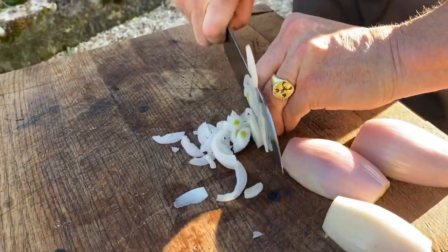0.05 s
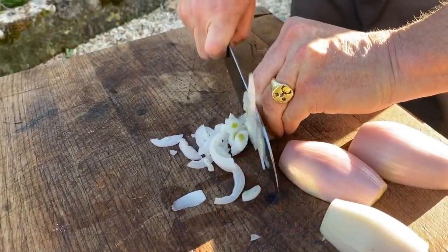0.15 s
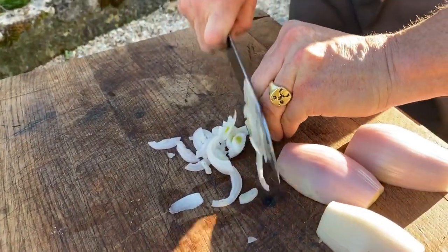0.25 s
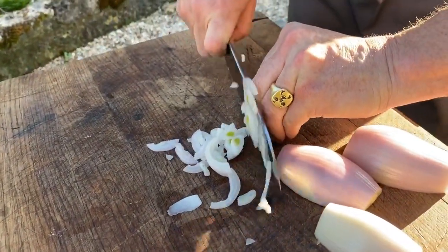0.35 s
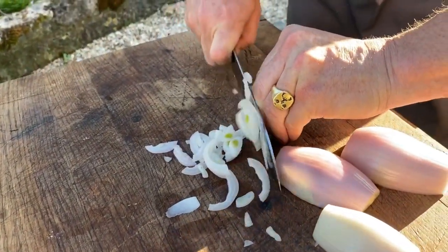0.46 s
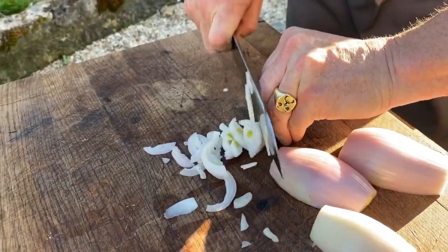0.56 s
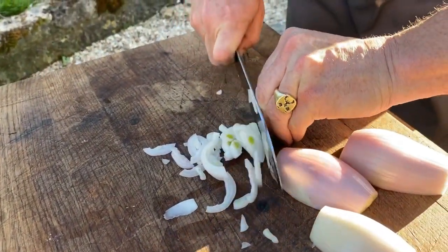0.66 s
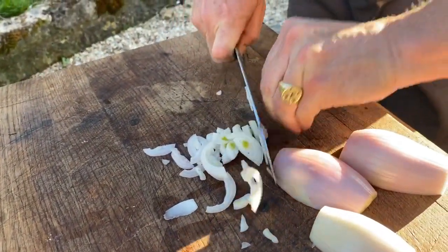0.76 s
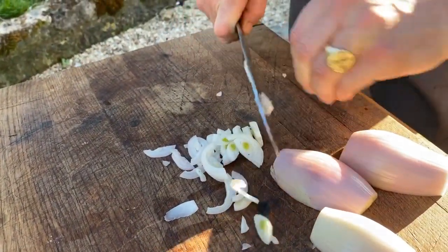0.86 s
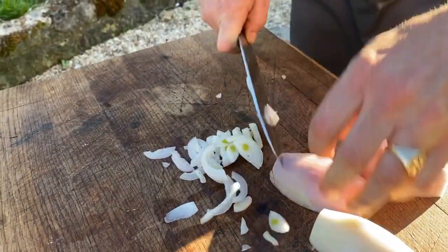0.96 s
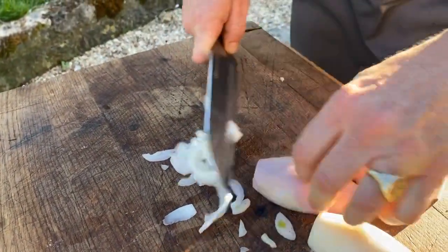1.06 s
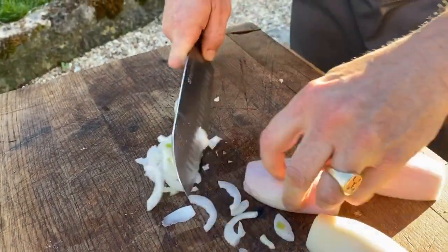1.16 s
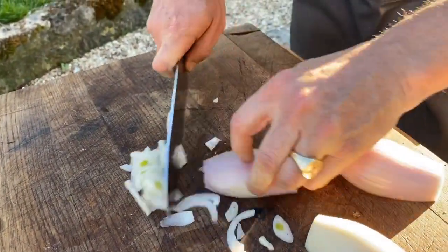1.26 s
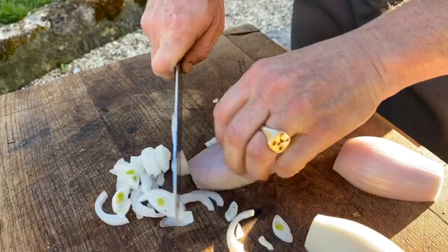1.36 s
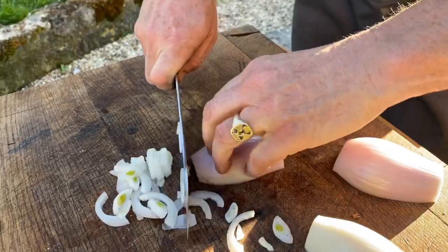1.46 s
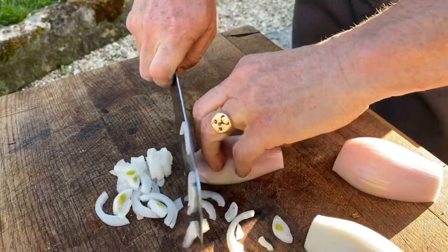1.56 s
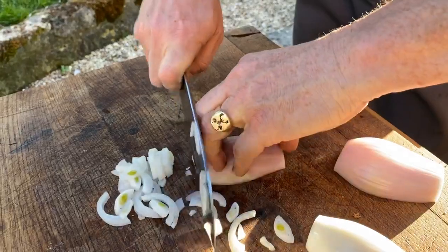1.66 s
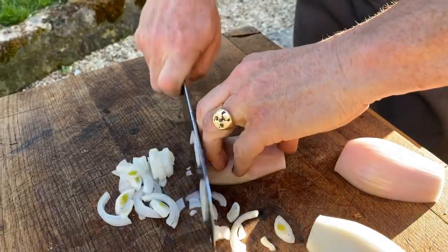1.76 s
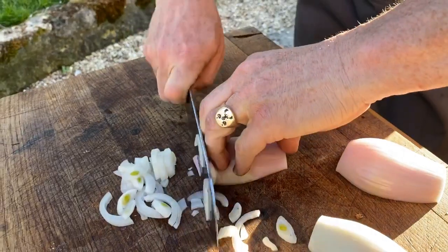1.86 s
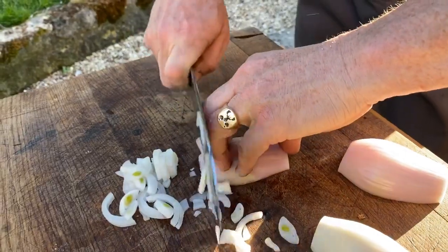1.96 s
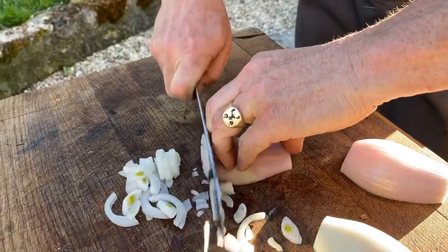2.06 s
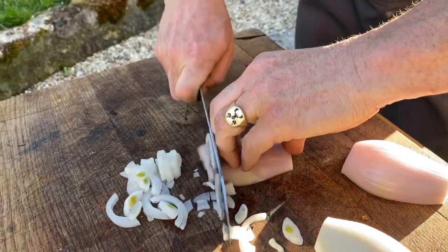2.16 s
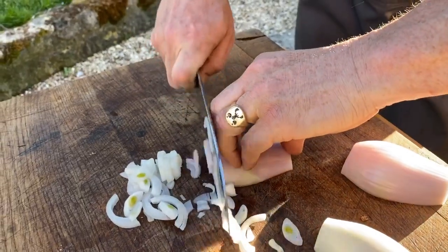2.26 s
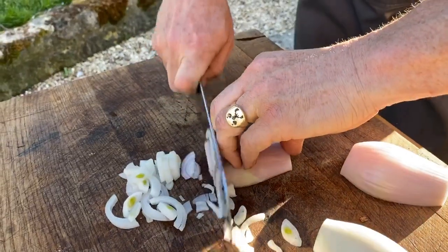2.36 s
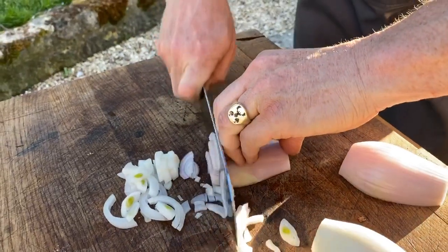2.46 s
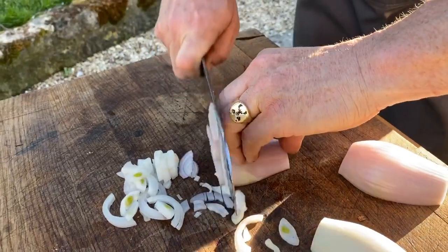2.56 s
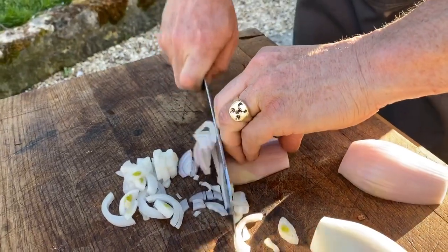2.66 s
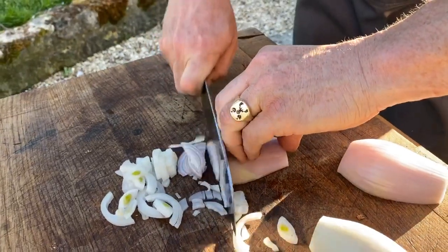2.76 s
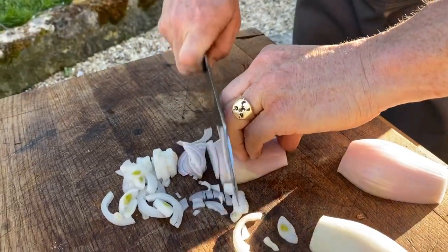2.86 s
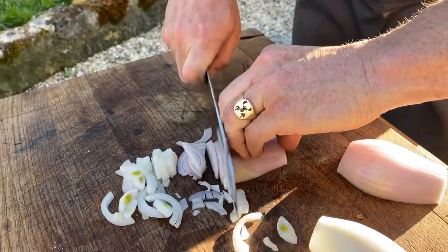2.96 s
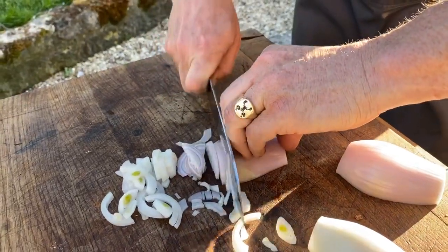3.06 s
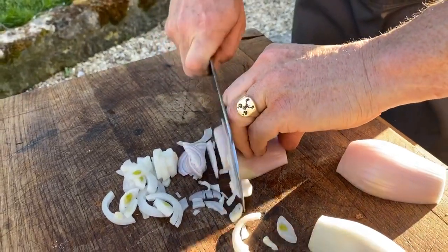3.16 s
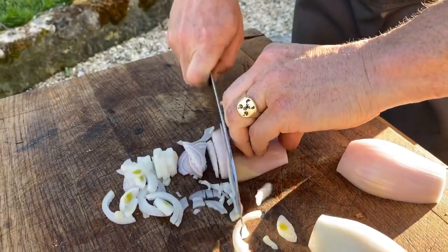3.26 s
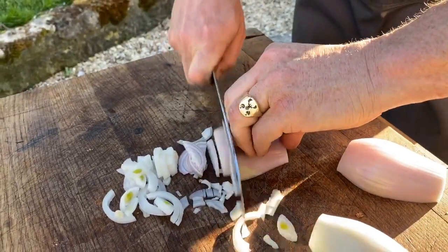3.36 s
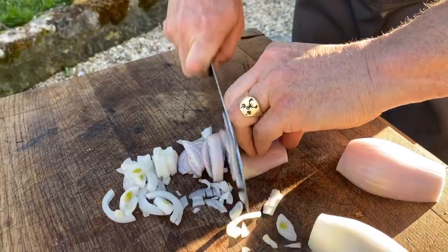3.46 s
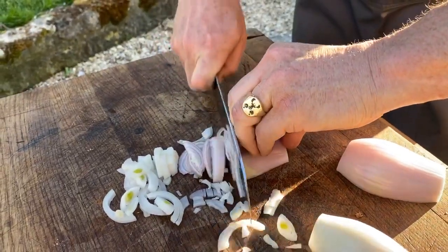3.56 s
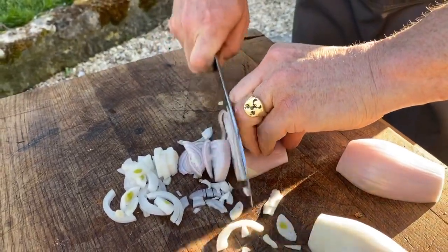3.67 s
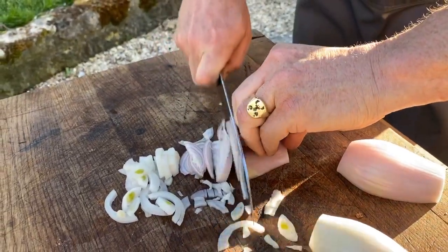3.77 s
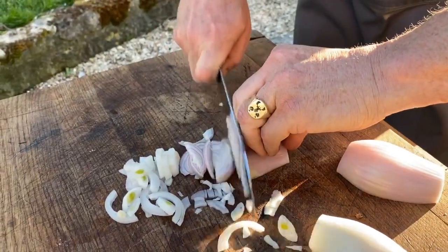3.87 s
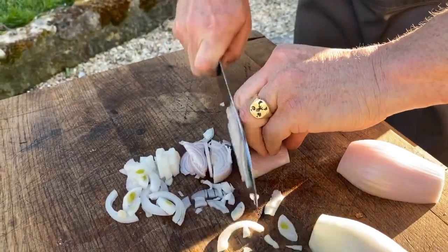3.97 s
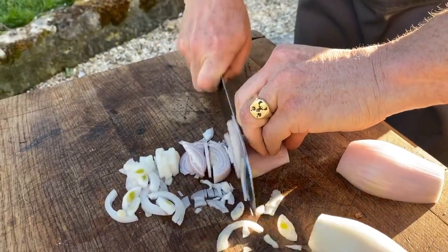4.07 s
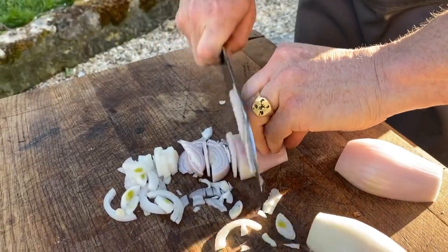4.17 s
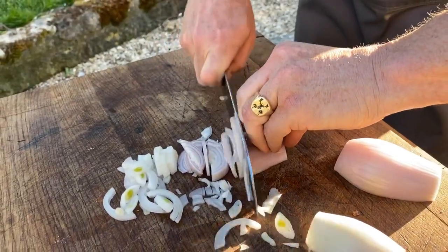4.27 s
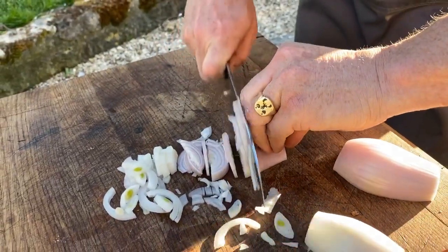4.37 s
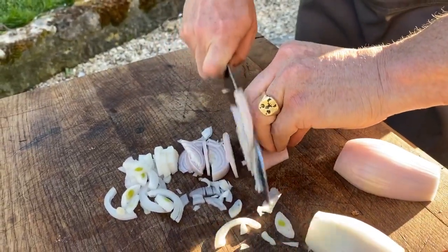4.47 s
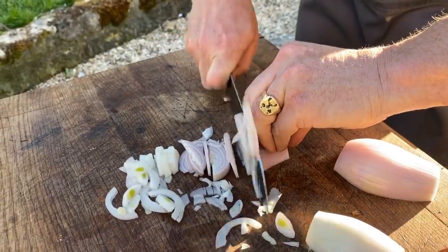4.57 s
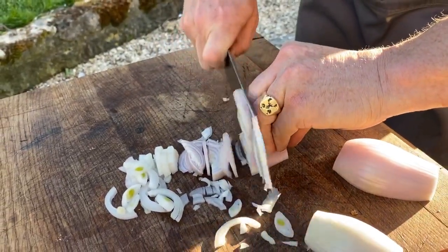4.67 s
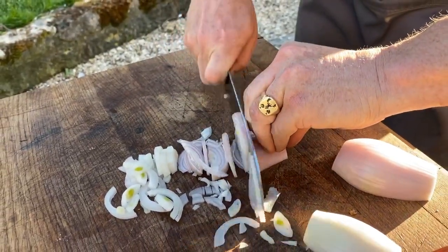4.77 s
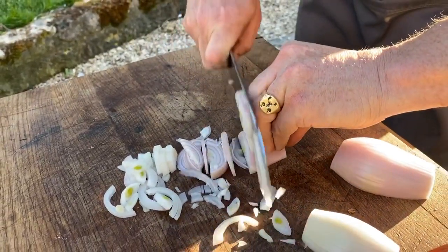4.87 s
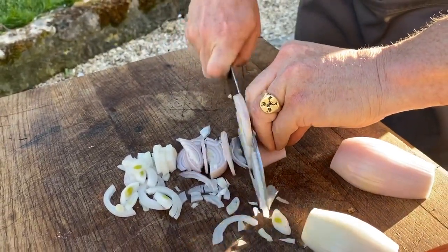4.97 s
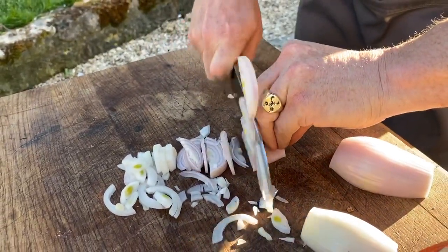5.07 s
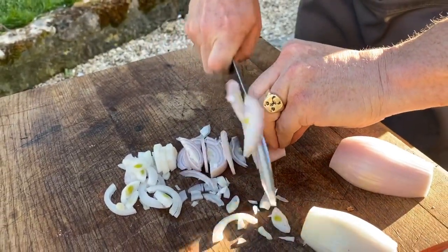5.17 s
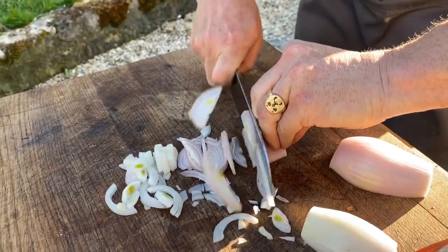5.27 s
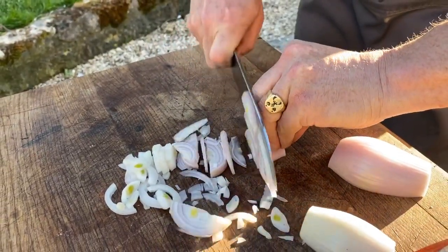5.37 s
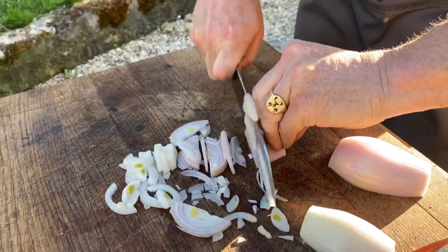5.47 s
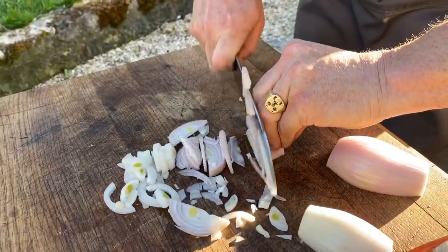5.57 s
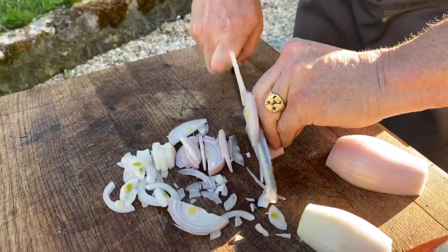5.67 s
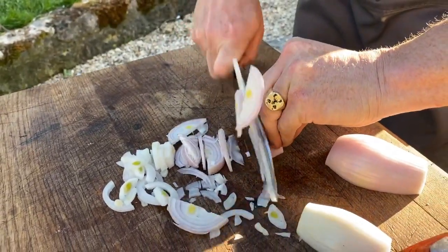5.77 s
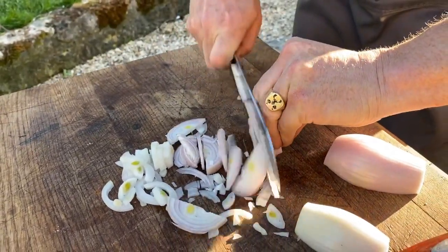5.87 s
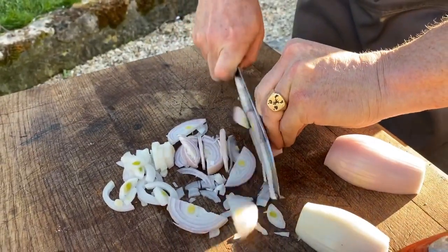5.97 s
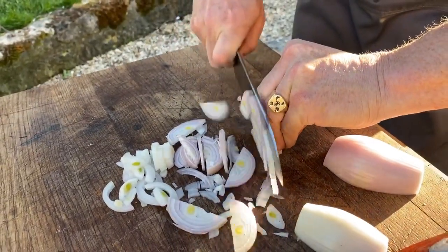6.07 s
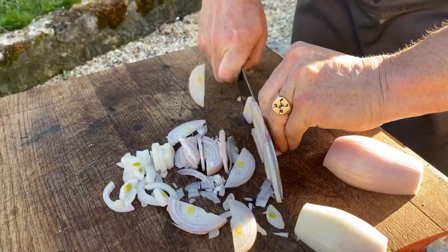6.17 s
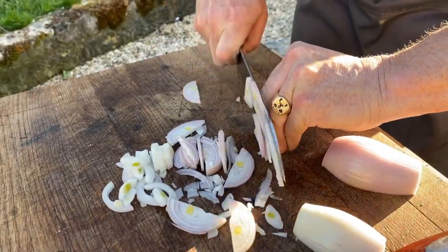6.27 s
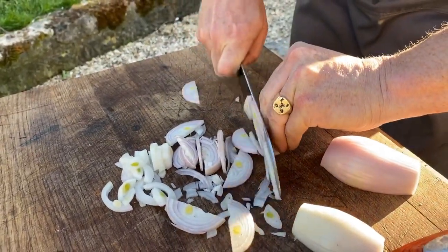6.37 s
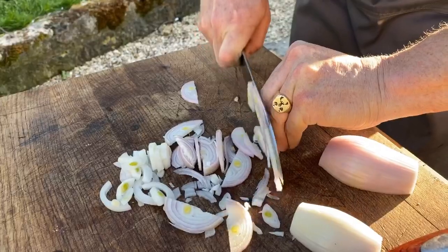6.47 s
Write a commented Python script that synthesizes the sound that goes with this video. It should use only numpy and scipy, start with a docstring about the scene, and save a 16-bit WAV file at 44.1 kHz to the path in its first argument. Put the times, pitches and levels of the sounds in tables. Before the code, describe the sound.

A knife slices shallots on a wooden board outdoors in quick, crisp knocks, pausing once briefly, with a light breeze.

```python
"""Slicing shallots outdoors

A chef's knife slices shallots on a thick wooden board, six strokes a second, pausing for the next bulb.
Each stroke crunches through the layers, knocks the board and scrapes on it so the blade rings thinly.
Near surfaces echo the knocks. A breeze buffets the close stereo microphone over a high hiss and faint
peeps. Fingers and bulb bump the board. The recorder's limiter ducks everything after the hardest knocks.
"""
import sys
import numpy as np
from scipy import signal
from scipy.fft import rfft, irfft, next_fast_len
from scipy.io import wavfile
from scipy.ndimage import uniform_filter1d, minimum_filter1d, map_coordinates

SR = 44100
rng = np.random.default_rng(int(sys.argv[2]) if len(sys.argv) > 2 else 0)


def digitize_waveform(pressure):
    """Quantize a signal to 16-bit integers and store it at the path in sys.argv[1].

    Rows of a 2-D input are taken as channels; values are limited to [-1, 1].
    """
    field = np.atleast_2d(pressure).T
    bounded = np.clip(field, -1, 1)
    quanta = np.round(bounded * 32767).astype(np.int16)
    wavfile.write(sys.argv[1], SR, quanta)


N = 287973

# Knife strokes. Each row: landing in seconds, blow in dB, ring in dB, clack in dB, bite in dB,
# scrape in dB, cutting time in seconds. Ring: how well the spot struck sounds the upper modes.
# Clack: how flat the edge lands. Bite: how sharply it catches the wood.
STROKES = [(-.042, -0.5, 7, -4, -5, -41.5, 0.027), (0.1265, 0.5, 4, -7.5, -1.5, -40, 0.032),
           (0.2943, 1, 11, -1.5, -9, -58, 0.023), (0.4612, -3.5, 0.5, 2, -16, -57, 0.027),
           (0.6315, -5.5, 4, -4.5, -14, -60, .028), (1.708, 1.5, 3.5, -3.5, 10, -31, .012),
           (1.8668, 3.5, 4.5, 0, 11.5, -35, 0.014), (2.0229, 5, -4.5, 3.5, 4.5, -28, 0.017),
           (2.1761, 0.5, 0, -4, 2.5, -52, .019), (2.3256, 2.5, 1.5, -3, 2, -44, 0.023),
           (2.478, 3.5, 3, 1, 13, -29, 0.019), (2.633, 4, 2, 1.5, 5, -33, 0.02),
           (2.7773, 7, 3.5, 11, 4, -24, 0.019), (3.0612, 3.5, 3, -4.5, -4, -33, 0.028),
           (3.2288, 4.5, 3, -2, 4, -27, 0.029), (3.393, 1, 2, -2.5, 3.5, -38, 0.032),
           (3.5755, -0.5, 2, -4.5, 0.5, -54, 0.036), (3.7472, 2, 0, -0.5, -8.5, -39, 0.042),
           (3.8935, 4.5, 6, -1.5, 7.5, -33, 0.019), (4.0655, 5, 5, 1, 4, -23, 0.02),
           (4.2509, -10.5, -2, -8, -2, -57, 0.033), (4.4088, 4.5, 5.5, -2, 3, -28, 0.036),
           (4.5679, 7, 8, 6, 5, -24, 0.022), (4.738, 5.5, 6, 13.5, 2, -24, .022),
           (4.9265, -2, 7.5, -9, -7, -40, 0.032), (5.1034, 5, 6, -4.5, 2.5, -31, 0.034),
           (5.2598, 4, 9.5, 9, 5, -28, 0.02), (5.4543, -9.5, 0, 1, 4, -44, 0.048),
           (5.6168, -1, 4.5, 0.5, 3, -37, .034), (5.791, 0, 8, -3, 3, -39, 0.035),
           (5.9845, 0.5, 13, -3.5, -1, -38, 0.041), (6.161, 1.5, 11.5, -1.5, 1, -37, 0.035),
           (6.3316, 1, 11, 1, 2, -39, 0.021), (6.5208, -4, 12.5, -3, 8, -37, 0.028)]
# Board modes. Each row: frequency in Hz, t60 in seconds, level in dB, left minus right in dB,
# left phase lead in radians.
BOARD_MODES = [(214, 0.068, -45.5, -15, -5), (278, 0.038, -26.5, 3.5, -0.1), (391.4, 0.16, -15, -7.7, -6.5),
               (403.8, 0.061, -15, -2, 0.37), (532, 0.013, -9.5, 6, -0.2), (671.3, 0.043, -10.5, 0.3, 4),
               (698, 0.037, -9.5, -8, -0.32), (703.4, 0.34, -35.5, -13, 2), (851.2, 0.11, -12.5, 2.5, -0.1),
               (899, 0.31, -38, 0.5, 2), (1015, 0.086, -14.5, -5.5, 1.92), (1104, 0.03, -8, -7.5, -1.5),
               (1138, 0.33, -32.5, -4.5, -0.5), (1243.7, 0.05, -15.5, -14.5, -3),
               (1306, 0.045, -0.5, 8, -3), (1312.7, 0.031, -2.5, 15.5, 2.5), (1484.4, 0.038, -9, -5, 0.1),
               (1756, 0.027, -6, -6.5, 3.5), (1772.6, 0.035, -8.5, -4.5, -1.36),
               (1853, 0.021, -25, -16, -2.9), (2160, 0.016, -25.5, -19.5, -0.5),
               (2310, 0.31, -50.5, -1.5, 2), (2480, 0.019, -22.5, 11, -0.2), (2944, 0.0089, -11.5, 5, 1.8),
               (2894, 0.031, -31.5, -2.9, 1.5), (3500, 0.023, -30, 10, 0.45), (3590, 0.22, -50.5, 5.5, 1.5),
               (4130, 0.031, -37, 17, -1.2)]
# Blade modes. Each row: frequency in Hz, t60 in seconds, level in dB.
BLADE_MODES = [(4380, .008, 2), (8440, 0.0047, -12), (10140, 0.03, -6), (11120, .035, -5), (11820, .02, -7),
               (12770, .012, -13.5), (13350, .012, -28.5), (15100, .01, -13)]
# Echoes off ground and body. Each row: lag in seconds, gain.
ECHOES = [(0.00418, 0.32), (0.00643, 0.48)]
# Breeze, light and then gusty. Each row: time in seconds, buffeting in dB, flutter in dB.
WIND_LEVELS = [(0, -41, -47), (.13, -46, -48), (.24, -43, -40.5), (.45, -39, -60), (.63, -53.5, -51),
               (.9, -42.5, -55.5), (1.25, -52, -60.5), (1.5, -45, -61), (1.95, -52.5, -63),
               (2.52, -51, -62), (2.62, -43, -43), (2.87, -48, -51), (3.05, -47.5, -56), (3.6, -51, -58),
               (3.9, -39.5, -55), (4, -30.5, -42), (4.3, -36, -43.5), (4.38, -44.5, -76), (4.6, -37.5, -47),
               (4.77, -37, -53), (4.86, -54, -60), (4.95, -36.5, -50), (5.08, -33, -47.5),
               (5.22, -33, -39.5), (5.36, -41.5, -52), (5.52, -52, -69), (5.56, -30, -49), (5.63, -52, -67),
               (6, -39.5, -58), (6.09, -56, -69), (6.33, -33, -46.5), (6.53, -59, -68)]
# Outdoor hiss. Each row: time in seconds, level in dB.
HISS_LEVELS = [(0, -52.5), (.8, -52), (1.3, -49), (3.6, -51.5), (4.8, -53), (5.8, -49.5), (6.53, -50.5)]
# Distant peeps. Each row: start in seconds, level in dB.
DISTANT_PEEPS = [(.055, -42.5), (.22, -45.5), (0.381, -46), (2.11, -49)]
# Fingers and bulb on the board. Each row: start in seconds, level in dB.
BOARD_BUMPS = [(0.383, -39), (1.105, -32.5), (1.122, -33.5), (1.422, -38.5), (1.488, -38.5), (1.529, -36.5),
               (1.593, -40.5)]
# Blade and skins over the wood. Each row: start in seconds, length in seconds, level in dB.
WOOD_BRUSHES = [(0.914, 0.029, -47.5), (1.005, 0.06, -49), (1.059, 0.011, -44.5), (1.078, 0.1, -57.5),
                (1.187, 0.075, -45), (1.38, 0.039, -49), (1.44, 0.12, -58), (2.893, 0.041, -35)]
# Noise spectra by source. Each row: frequency in Hz, relative density in dB.
CRUNCH_SPECTRUM = [(300, 1.5), (1200, 3.5), (2100, 0.5), (3700, -0.5), (5600, -7.5), (7500, -9), (9000, -9),
                   (11500, -4.5), (13500, -23.5), (16000, -16)]
SCATTER_SPECTRUM = [(100, -11.5), (330, -1), (460, 3.5), (560, 3.5), (680, 3), (820, -2), (950, -7.5),
                    (1250, 4.5), (1550, -2), (1900, -7.5), (2300, -17.5), (3100, -21.5), (4500, -30.5),
                    (9000, -44.5)]
BUFFET_SPECTRUM = [(15, -17), (35, -8.5), (65, -1.5), (100, -3), (170, -15), (300, -29.5), (800, -59.5)]
FLUTTER_SPECTRUM = [(50, -20), (120, -2.5), (200, -1.5), (330, -5), (520, -13.5), (900, -22), (3000, -42.5)]
HISS_SPECTRUM = [(100, 5.5), (500, -15.5), (1500, -17.5), (2800, -9), (3500, -5), (4400, -7), (5700, 1),
                 (7300, 0.5), (8700, -2), (10500, -7), (12400, -14.5), (13500, -36), (16000, -37.5)]
BUMP_SPECTRUM = [(40, -15), (130, 7), (300, 1), (520, -6), (900, -56), (3000, -46.5)]
BRUSH_SPECTRUM = [(150, 6.5), (500, 4.5), (1800, -1.5), (4000, -8), (11000, -7.5), (15000, -20)]

SIDES = np.array([[1], [-1]])  # left, right
TIME_S = np.arange(N) / SR


def undb(db):
    """Decibels to gain."""
    return 10 ** (np.asarray(db) / 20)


def unit_rms(x):
    """Scale to rms 1."""
    return x / np.sqrt(np.mean(x ** 2))


def seconds(length_s):
    """Time axis of a short sound."""
    return np.arange(int(length_s * SR)) / SR


def add(out, start_s, x):
    """Mix x into out from start_s, dropping what falls outside."""
    start = int(start_s * SR)
    x = x[..., max(-start, 0):]
    start = max(start, 0)
    out[:, start:start + x.shape[-1]] += x[..., :N - start]


def tint(x, spectrum):
    """Minimum-phase filter through (Hz, dB) points."""
    size = 2 * next_fast_len(x.shape[-1])
    hz, db = np.transpose(spectrum)
    log_hz = np.log(np.arange(size // 2 + 1) * SR / size + 1)
    gain = undb(np.interp(log_hz, np.log(hz), db))
    cepstrum = irfft(np.log(gain))
    cepstrum[1:size // 2] *= 2
    cepstrum[size // 2 + 1:] = 0
    return irfft(rfft(x, size) * np.exp(rfft(cepstrum)))[..., :x.shape[-1]]


def noise(size, side_db):
    """Stereo noise; long waves reach both microphone ports nearly alike."""
    mid, side = rng.standard_normal((2, size))
    side = tint(side, [(40, -4.5), (200, -9), (500, 1), (1300, -1)])
    return unit_rms(mid + undb(side_db) * SIDES * side)


def shaped_noise(size, spectrum, side_db):
    """Filtered stereo noise, rms 1."""
    return unit_rms(tint(noise(size, side_db), spectrum))


def wander(rate_hz):
    """Smooth random curve, rms 1."""
    knots = rng.standard_normal(int(N / SR * rate_hz) + 2)
    return unit_rms(map_coordinates(knots, [TIME_S * rate_hz], order=2, mode="nearest"))


def crackle(size, spread_db):
    """Dense clicks of very unequal size, as from bursting cells."""
    return unit_rms(noise(size, side_db=-0.49) * undb(spread_db * rng.exponential(size=size)))


def crunch(gain_db, usual_cut_s, release_s, pop_db):
    """Layers burst until just after the blade meets wood; quicker, harder cuts are louder."""
    out = np.zeros((2, N))
    for land_s, blow_db, *_, cut_s in STROKES:
        level_db = gain_db + 4.5 * np.log2(usual_cut_s / cut_s) + 0.25 * blow_db
        t = seconds(cut_s + 0.05)
        push = np.minimum(t / 0.01, 1) * np.exp(-np.maximum(t - cut_s, 0) / release_s)
        # skins give way in pops of about 1 ms
        pop_sizes = np.interp(t, np.linspace(0, t[-1], 70), rng.exponential(size=70))
        pops = unit_rms(undb(pop_db * pop_sizes))
        cells = unit_rms(tint(crackle(len(t), spread_db=1.5), CRUNCH_SPECTRUM))
        add(out, land_s - cut_s, undb(level_db) * push * pops * cells)
    return out


def board_ring(contact_s, detune_spread, spot_spread_db, damping_spread):
    """One blow on the board; hand weight and the spot struck vary each mode a little."""
    t = seconds(0.3)
    ring = np.zeros((2, len(t)))
    for hz, t60_s, db, pan_db, lead_rad in BOARD_MODES:
        detune, spot, grip = rng.standard_normal(3)
        mode_hz = hz * (1 + detune_spread * detune)
        decay_per_s = np.log(1000) / t60_s * np.exp(damping_spread * grip)
        swing = np.exp((2j * np.pi * mode_hz - decay_per_s) * t[t < t60_s])
        port_gain = undb(db + spot_spread_db * spot + SIDES * pan_db / 2)
        port_phase = np.exp(1j * SIDES * lead_rad / 2)
        add(ring, 0, (port_gain * port_phase * swing).imag)
    return ring * (1 - np.exp(-t / contact_s))


def knock_spectrum(blow_db, ring_db, clack_db, bite_db):
    """(Hz, dB) colour of one landing; almost no deep bass comes through."""
    soft_db, hard_db = max(-blow_db, 0), max(blow_db, 0)
    thud_db = 0.5 + 0.37 * soft_db - 0.2 * ring_db - 0.15 * hard_db  # cushioned blows are mostly thud
    deep_db = thud_db + 0.89 * hard_db  # hard blows shove the whole board
    mid_db = -0.5 + 0.25 * clack_db  # flat landings lift the middle
    return [(20, -24), (110, deep_db), (250, deep_db), (380, thud_db), (900, thud_db),
            (1200, 0), (1380, 0), (1520, mid_db), (1700, mid_db), (1820, ring_db), (2080, ring_db),
            (2400, clack_db / 2), (2800, clack_db), (3250, clack_db),
            (3600, bite_db / 2 - 2), (4100, bite_db), (4450, bite_db), (5000, 0)]


def scatter(gain_db, t60_s, late_db, late_t60_s, build_s):
    """Stones and walls scatter a knock: a short diffuse tail and a faint longer one."""
    t = seconds(0.3)
    fade = undb(-60 * t / t60_s) + undb(late_db - 60 * t / late_t60_s)
    build = np.minimum(t / build_s, 1)
    return undb(gain_db) * shaped_noise(len(t), SCATTER_SPECTRUM, side_db=-0.73) * fade * build


def knocks(gain_db, tail_contrast):
    """The edge lands on the board. Returns direct and scattered sound."""
    direct, scattered = np.zeros((2, 2, N))
    for land_s, blow_db, ring_db, clack_db, bite_db, *_ in STROKES:
        spectrum = knock_spectrum(blow_db, ring_db, clack_db, bite_db)
        # scatter gathers sound from all sides of the board, so it varies less
        tail_spectrum = [(hz, tail_contrast * db) for hz, db in spectrum]
        ring = board_ring(contact_s=0.00038, detune_spread=0.0074, spot_spread_db=1.4,
                          damping_spread=0.037)
        tail = scatter(gain_db=-21.5, t60_s=0.14, late_db=-17.5, late_t60_s=0.5, build_s=0.0086)
        gain = undb(gain_db + blow_db)
        add(direct, land_s, gain * tint(ring, spectrum))
        add(scattered, land_s, gain * tint(tail, tail_spectrum))
    return direct, scattered


def near_echoes(x, lowpass_hz):
    """Ground and body throw back dull copies within a few milliseconds."""
    lowpass = signal.butter(2, lowpass_hz, fs=SR, output="sos")
    dull = signal.sosfiltfilt(lowpass, x, padtype="constant")
    out = np.zeros((2, N))
    for lag_s, gain in ECHOES:
        add(out, lag_s, gain * dull)
    return out


def blade_scrape(gain_db, skid_s):
    """The edge skids briefly in the wood and the steel rings."""
    out, t = np.zeros((2, N)), seconds(0.05)
    steel = sum(undb(db - 60 * t / t60_s) * np.sin(2 * np.pi * hz * t) for hz, t60_s, db in BLADE_MODES)
    steel /= np.linalg.norm(steel)
    for land_s, *_, scrape_db, _ in STROKES:
        skid = crackle(len(t), spread_db=3) / (1 + (t / skid_s) ** 6)
        add(out, land_s, undb(gain_db + scrape_db) * signal.fftconvolve(skid, steel[None], axes=1))
    return out


def breeze(buffet_gain_db, flutter_gain_db, puff_db, eddy_db):
    """Slow buffets and quicker eddies at the microphone ports; both come in puffs."""
    times_s, buffet_db, flutter_db = np.transpose(WIND_LEVELS)
    swell_db = puff_db * wander(rate_hz=12)
    low_db = buffet_gain_db + np.interp(TIME_S, times_s, buffet_db) + swell_db
    low_db = low_db + 3.7 * SIDES  # stronger on the left
    buffets = undb(low_db) * shaped_noise(N, BUFFET_SPECTRUM, side_db=-1.7)
    high_db = flutter_gain_db + np.interp(TIME_S, times_s, flutter_db) + swell_db
    high_db += eddy_db * wander(rate_hz=35)
    eddies = undb(high_db) * shaped_noise(N, FLUTTER_SPECTRUM, side_db=-0.64)
    return buffets + eddies


def outdoor_hiss(gain_db, flicker_db):
    """A high hiss that swells and sinks."""
    level_db = np.interp(TIME_S, *np.transpose(HISS_LEVELS)) + flicker_db * wander(rate_hz=25)
    return undb(gain_db + level_db) * shaped_noise(N, HISS_SPECTRUM, side_db=1.9)


def peeps(gain_db, pitch_hz, length_s):
    """Faint, thin peeps far off, blurred by an unsteady pitch."""
    out, t = np.zeros((2, N)), seconds(length_s)
    envelope = np.sin(np.pi * t / length_s) * np.exp(-t / length_s)
    for start_s, db in DISTANT_PEEPS:
        drift_rad = np.cumsum(0.09 * rng.standard_normal(len(t)))
        add(out, start_s, undb(gain_db + db) * envelope * np.sin(2 * np.pi * pitch_hz * t + drift_rad))
    return out


def bumps(rise_s):
    """Fingers and bulb thump softly on the board."""
    out, t = np.zeros((2, N)), seconds(0.12)
    envelope = t / rise_s * np.exp(1 - t / rise_s)
    for start_s, db in BOARD_BUMPS:
        add(out, start_s, undb(db) * envelope * shaped_noise(len(t), BUMP_SPECTRUM, side_db=0))
    return out


def brushes():
    """Blade and skins rub over the wood as slices are pushed aside."""
    out, t = np.zeros((2, N)), seconds(0.12)
    for start_s, length_s, db in WOOD_BRUSHES:
        rub = unit_rms(tint(crackle(len(t), spread_db=3.2), BRUSH_SPECTRUM))
        envelope = np.sin(np.pi * np.minimum(t / length_s, 1))
        add(out, start_s, undb(db) * envelope * rub)
    return out


def limiter(x, threshold_db, sense_s, hold_s, release_s):
    """A hard knock turns everything down at once; the gain holds, then recovers."""
    sense, hold = int(sense_s * SR) + 1, int(hold_s * SR) + 1
    power = uniform_filter1d(np.mean(x ** 2, axis=0), sense)
    wanted_db = -10 * np.log10(np.maximum(power / undb(threshold_db) ** 2, 1))
    held_db = minimum_filter1d(wanted_db, hold, origin=(hold - 1) // 2, mode="nearest")
    pole = np.exp(-1 / (release_s * SR))
    gain_db = np.minimum(held_db, signal.lfilter([1 - pole], [1, -pole], held_db))
    return x * undb(uniform_filter1d(gain_db, sense, origin=-(sense // 2) + 1))


def scene():
    """Knife and board with their echoes, in the open air."""
    direct, scattered = knocks(gain_db=-0.5, tail_contrast=0.67)
    board = direct + near_echoes(direct, lowpass_hz=2180) + scattered
    knife = crunch(gain_db=-34, usual_cut_s=0.023, release_s=0.015, pop_db=2.5)
    knife += blade_scrape(gain_db=-4.5, skid_s=0.016)
    air = breeze(buffet_gain_db=1, flutter_gain_db=1.5, puff_db=2, eddy_db=3.5)
    air += outdoor_hiss(gain_db=4.5, flicker_db=1)
    air += peeps(gain_db=2, pitch_hz=3680, length_s=0.053)
    return board + knife + air + bumps(rise_s=0.0073) + brushes()


def record(dry):
    """The recorder drops deep bass, ducks after hard knocks, rounds peaks and cuts the top."""
    bottom_hz, top_hz = 35, 15900
    lean = signal.sosfilt(signal.butter(2, bottom_hz, "high", fs=SR, output="sos"), dry)
    limited = limiter(lean, threshold_db=-7.5, sense_s=0.0036, hold_s=0.11, release_s=0.012)
    rounded = limited / (1 + limited ** 6) ** (1 / 6)
    return signal.sosfilt(signal.ellip(8, 0.2, 70, top_hz, fs=SR, output="sos"), rounded)


dry = scene()
out = record(dry)
digitize_waveform(out)
```